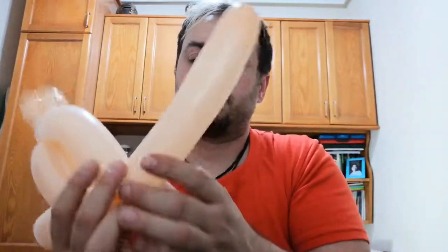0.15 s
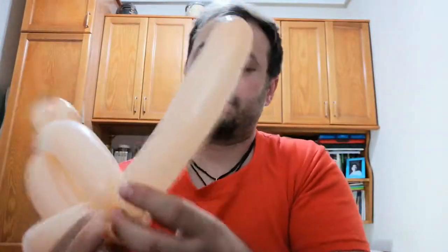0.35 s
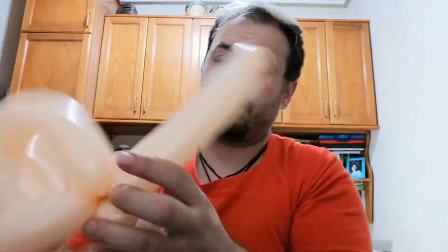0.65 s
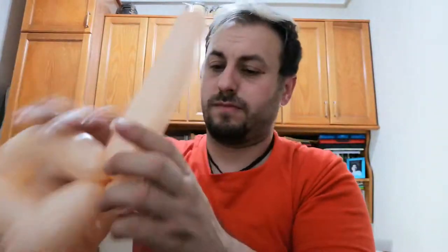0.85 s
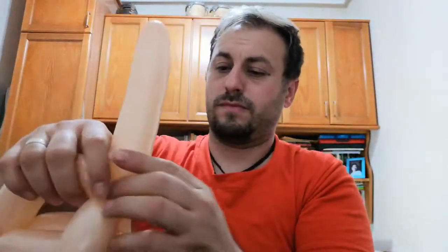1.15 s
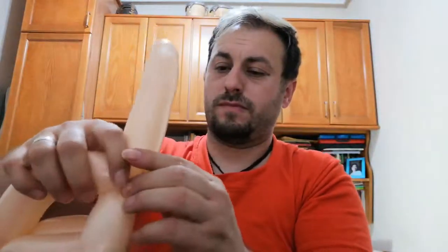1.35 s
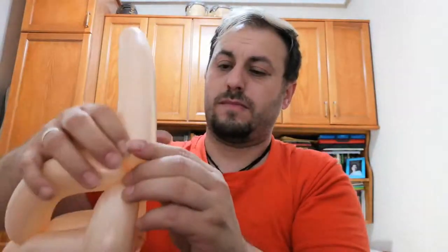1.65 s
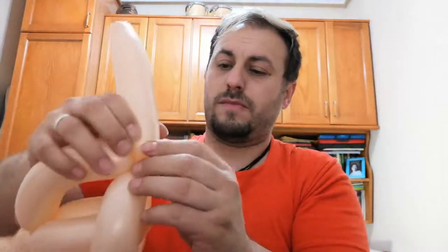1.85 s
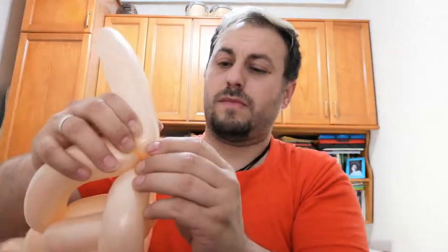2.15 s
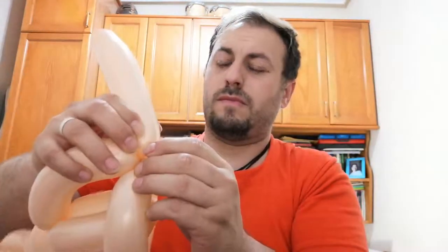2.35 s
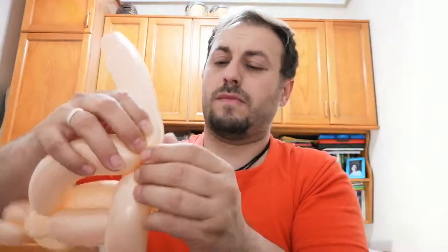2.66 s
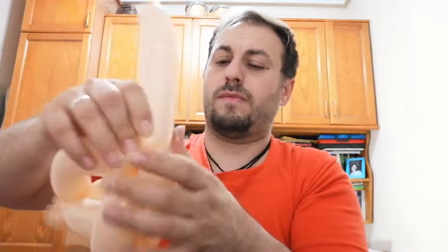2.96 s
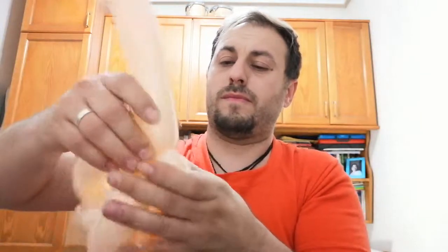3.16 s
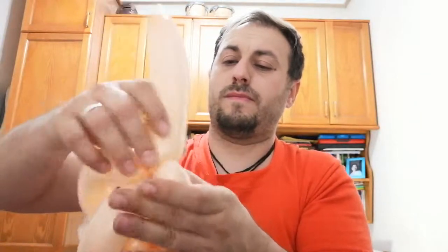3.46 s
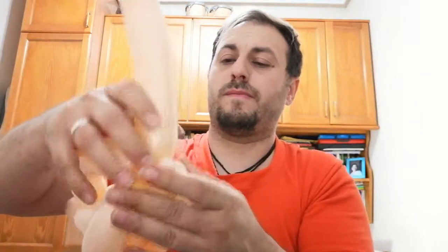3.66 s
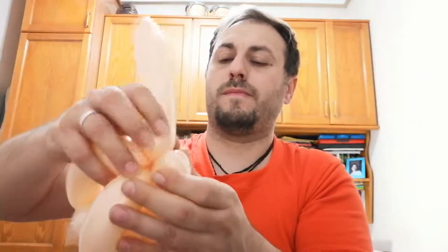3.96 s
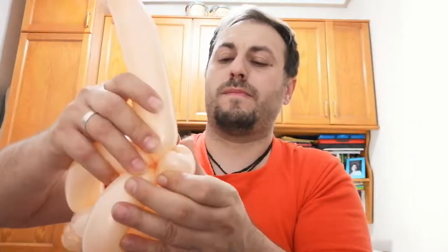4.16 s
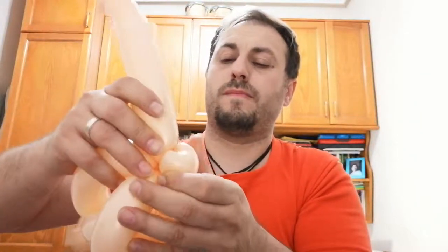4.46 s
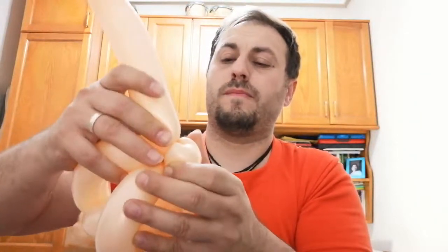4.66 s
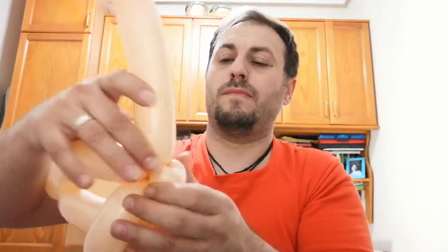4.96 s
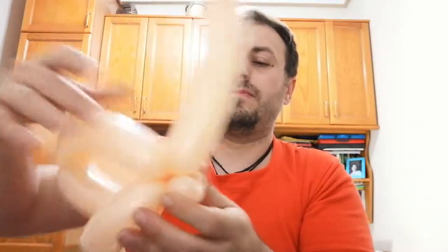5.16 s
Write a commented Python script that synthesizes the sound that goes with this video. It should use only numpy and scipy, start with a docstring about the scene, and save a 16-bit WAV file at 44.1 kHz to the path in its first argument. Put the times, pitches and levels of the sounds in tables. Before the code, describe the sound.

Taut latex balloons are twisted close to the microphone, with dry creaks, sharp snaps, short squeaks and low hollow thumps in a small room.

```python
"""A small, bare-walled room: long latex balloons are twisted by hand close to a stereo microphone.
Taut latex sticks and slips: single slips snap, runs of slips creak, regular fast ones squeak.
Every slip is a pulse that rings the balloon skin; low thumps, from handling or with snaps, ring the
air in the tubes. One hand slides along a tube as filtered noise; a noise tail is the room, over a
faint steady hush."""
import sys
import numpy as np
from scipy import signal
from scipy.fft import rfft, irfft, next_fast_len
from scipy.io import wavfile

SR = 44100
rng = np.random.default_rng(int(sys.argv[2]) if len(sys.argv) > 2 else 0)


def bounce(signal):
    """Save signal as a 16-bit WAV file at the path given by the first command-line argument."""
    frames = np.transpose(np.atleast_2d(signal))
    limited = np.clip(frames, -1, 1)
    pcm = np.round(limited * 32767).astype(np.int16)
    wavfile.write(sys.argv[1], SR, pcm)


N = 233818  # length in samples

# single hard slips: (time [s], level [dB], treble [dB])
SNAPS = [(0.0406, -11.5, -4), (0.0713, -19, 9), (0.0829, -18, 4.5), (0.158, -17, 6.5), (0.176, -16.5, 3),
         (0.2293, -24, 4), (0.3058, -13.5, 7), (0.4404, -20, 5), (0.4474, -12.5, 1), (0.5214, -24.5, 2),
         (0.612, -27, -6), (0.9742, -16.5, -3.5), (1.2139, -16, -2), (1.4503, -13.5, -5.5),
         (1.5637, -21, -2), (1.7506, -29.5, 14), (1.847, -25.5, 2), (2.0037, -22, 4), (2.1763, -17.5, -2),
         (2.2913, -12.5, -2.5), (2.4281, -20, -2), (2.4989, -23, 0), (2.5379, -11, 3), (2.5931, -11.5, 3.5),
         (2.7263, -28.5, -8), (2.7705, -18.5, 10.5), (2.868, -23, 30), (2.965, -25, 0), (3.0051, -17, -1.5),
         (3.0624, -19, -8), (3.2157, -21.5, 4), (3.3305, -14.5, 0), (3.3398, -17.5, -7), (3.357, -19, 14),
         (3.3756, -17.5, 2), (3.442, -23.5, 9), (3.5355, -20, 10.5), (3.609, -15.5, -1), (3.7, -16, -4),
         (3.7424, -21.5, 3), (3.7676, -21, -10), (3.83, -19.5, -7), (3.8905, -16.5, 1), (3.97, -20, 0),
         (4.0041, -17, 2), (4.067, -14.5, 0), (4.086, -23, 7), (4.109, -12.5, 0.5), (4.154, -14, 3),
         (4.183, -15, 0.5), (4.269, -13, 0.5), (4.2985, -16.5, 3), (4.3443, -11.5, 6.5), (4.3614, -18, 3),
         (4.409, -14.5, 3.5), (4.4332, -19.5, 7), (4.4944, -26.5, -3), (4.5812, -25, 0.5),
         (4.616, -20.5, -16), (4.7184, -12, 3), (4.7277, -15, 8), (4.792, -18.5, -3), (4.9706, -17, -3),
         (5.0664, -19.5, 0.5), (5.2208, -17.5, -1), (5.272, -18.5, 1.5)]
# rubbing strokes: (start [s], end [s], mean slip rate [1/s], level [dB])
RUBS = [(0, 0.105, 356, -28.5), (0.159, 0.212, 464, -30), (0.224, 0.354, 202, -37.5),
        (0.451, 0.48, 490, -31.5), (0.499, 0.571, 160, -45), (0.639, 0.677, 260, -37),
        (0.918, 1.176, 472, -33), (1.039, 1.063, 300, -29), (1.176, 1.254, 457, -24),
        (1.329, 1.354, 160, -37.5), (1.491, 1.528, 108, -33.5), (1.658, 1.682, 680, -24),
        (1.701, 1.811, 385, -34), (1.831, 1.909, 370, -32), (1.926, 1.949, 276, -26.5),
        (1.998, 2.072, 560, -28), (2.085, 2.152, 386, -31), (2.191, 2.21, 330, -39),
        (2.327, 2.39, 103, -33), (2.437, 2.47, 192, -30), (2.477, 2.533, 153, -27.5),
        (2.54, 2.623, 156, -36), (2.791, 2.824, 800, -25.5), (2.825, 2.93, 240, -30.5),
        (2.921, 2.988, 366, -26), (3.024, 3.043, 300, -24.5), (3.104, 3.178, 370, -25),
        (3.188, 3.288, 345, -23.5), (3.296, 3.456, 243, -29), (3.459, 3.635, 290, -25.5),
        (3.669, 3.712, 275, -24.5), (3.714, 3.79, 304, -29.5), (3.835, 3.845, 410, -23),
        (3.952, 4.072, 340, -26), (4.068, 4.101, 410, -21.5), (4.111, 4.188, 420, -30.5),
        (4.208, 4.541, 203, -36.5), (4.615, 4.704, 190, -28.5), (4.743, 4.912, 570, -25.5),
        (4.942, 4.967, 224, -32.5), (4.973, 4.994, 406, -21.5), (5.004, 5.086, 253, -34),
        (5.268, 5.299, 326, -30.5)]
RUB_TREBLE_DB = 0


def undb(db):
    """Decibels to gain."""
    return 10 ** (np.asarray(db) / 20)


def unit(x):
    """Scale to an energy of one per channel, averaged over the channels."""
    return x / np.sqrt(np.mean(np.sum(x ** 2, axis=-1)) + 1e-18)


def seconds(length):
    """Time axis of the given length in seconds."""
    return np.arange(int(length * SR)) / SR


def add(out, start, x):
    """Mix x into out from the given time on."""
    i = max(int(start * SR), 0)
    out[:, i:i + x.shape[-1]] += x[..., :max(N - i, 0)]


def convolve(a, b):
    """Convolution along time, channel by channel."""
    return signal.fftconvolve(np.atleast_2d(a), np.atleast_2d(b), axes=-1)


def butter(order, hz, kind="low"):
    """Butterworth filter sections."""
    return signal.butter(order, hz, kind, fs=SR, output="sos")


def spectrum_db(points, f):
    """Join (frequency [Hz], level [dB]) points on a log-frequency axis."""
    hz, db = np.transpose(points)
    return np.interp(np.log(f + 1), np.log(hz), db)


def colour(x, points):
    """Filter a long sound by (frequency [Hz], level [dB]) points."""
    size = next_fast_len(N)
    gain = undb(spectrum_db(points, np.fft.rfftfreq(size, 1 / SR)))
    return irfft(rfft(x, size) * gain, size)[..., :N]


def still_room():
    """The faint steady hush of the still room: shaped noise, independent at each ear."""
    # spectrum of the hush: (frequency [Hz], relative level [dB])
    hush_points = [(25, -13), (62, 16), (130, -15), (300, 10), (1500, 1), (6000, -30), (15000, -29)]
    hush = colour(rng.standard_normal((2, N)), hush_points)
    return undb(-50) * np.sqrt(N) * unit(hush)


def room(x, wet_db, t60_low=0.33, t60_high=0.39, build_s=0.0034):
    """Close walls: a dense tail, different at each ear; its treble starts lower and dies a little later."""
    t = seconds(.6)
    noise = rng.standard_normal((2, len(t)))
    low = signal.sosfilt(butter(2, 4000), noise)
    high = signal.sosfilt(butter(2, 4000, "high"), noise[::-1])  # ears swapped
    tail = low * undb(-60 * t / t60_low) + high * undb(-60 * t / t60_high - 1.0)
    build_up = 1 - np.exp(-(t / build_s) ** 2)
    return undb(wet_db) * convolve(x, unit(tail * build_up))[:, :N]


def grip(at):
    """Hollow body [dB] and ring of the contact patch [Hz] at a moment."""
    # the hold on the balloon; pinched hard for the twist it loses its hollow ring,
    # and the wound-up neck rings higher: (time [s], hollow body [dB], patch ring [Hz])
    hold = [(0, 0.5, 2010), (0.6, 9, 1900), (1.15, 3, 2100), (1.33, -1, 2030), (1.45, -9.5, 2160),
            (1.7, -16.5, 2180), (2.17, -13.5, 1900), (2.2, 10, 2130), (2.29, -20, 2200), (2.58, -9.5, 2030),
            (2.73, 1, 2200), (3.3, 2, 1880), (3.83, 1.5, 1900), (3.99, -4.5, 1970), (4.08, 1, 2000),
            (4.2, -2.5, 3080), (4.45, -2.5, 3560), (4.64, 2, 1900), (4.82, -6.5, 1770), (5.02, 1.5, 1900),
            (5.3, 4.5, 2320)]
    times, body_db, patch_hz = np.transpose(hold)
    return np.interp(at, times, body_db), np.interp(at, times, patch_hz)


def modes(table, spread=0.026):
    """Impulse response of (frequency [Hz], width [Hz], level [dB]) resonances, each randomly detuned."""
    t = seconds(.2)
    total = 0
    for k, (hz, width, db) in enumerate(table):
        tuned_hz = hz * (1 + spread * rng.standard_normal())
        ring = np.sin(2 * np.pi * tuned_hz * t) * np.exp(-np.pi * width * t)
        total = total + (-1) ** k * undb(db) * unit(ring)  # neighbours in opposite polarity
    return unit(total)


def slips(length, first_hz, last_hz, scatter, size_db):
    """Stick-slip pulses at scattered intervals; each is sized by the interval before its latest one."""
    count = max(int(length * SR), 64)
    chance = np.random.default_rng(rng.integers(2 ** 31)).standard_normal((2, 600))
    wait = np.exp(scatter * chance[0] - scatter ** 2 / 2)  # in cycles, mean one
    cycles = np.cumsum(np.linspace(first_hz, last_hz, count)) / SR
    at = np.searchsorted(cycles, np.cumsum(wait) - wait[0])
    sizes = np.sqrt(np.roll(wait, 1)) * undb(size_db * np.clip(chance[1], -2, 2))
    return np.bincount(at, sizes, count + 1)[:count]


def slide():
    """A hand gliding along one tube: friction noise, partly shared by the ears, bows its resonances."""
    # loudness of the slide, silent outside these times: (time [s], level [dB])
    slide_level = [(.75, -58), (.775, -37.5), (.835, -39.5), (.865, -32.5), (.92, -23), (.95, -25.5),
                   (.98, -65)]
    # what the hand sets ringing: (frequency [Hz], width [Hz], level [dB])
    slide_modes = [(163, 6.4, -0.5), (276, 9.8, -8), (944, 83, -6.5), (1600, 67, -5), (1830, 33, -4.5),
                   (2200, 180, -3.5), (5600, 12000, -8.5)]
    t = np.arange(N) / SR
    friction = rng.standard_normal(N) + 1.1 * rng.standard_normal((2, N))
    bowed = convolve(friction, modes(slide_modes, spread=0.0048))[:, :N]
    level = undb(np.interp(t, *np.transpose(slide_level)))
    sliding = (t > slide_level[0][0]) * (t < slide_level[-1][0])
    return bowed / bowed.std() * level * sliding


def kneading(push_db=1, push_s=0.0043, ring_db=-3, drag_db=-10, body_share=1.0):
    """Low thumps, from handling or with snaps, push and ring the tubes' air; a loose dragging grip stirs it."""
    # low thumps of the air in the tubes, some from handling, some together with snaps:
    # (time [s], pitch [Hz], level before the push and ring gains [dB])
    air_thumps = [(0.037, 280, -30), (0.172, 248, -30), (0.422, 95.5, -32.5), (0.463, 175, -24),
                  (0.926, 112, -17.5), (0.94, 58, -26), (1.007, 90.5, -30), (1.088, 96, -26.5),
                  (2.204, 90, -40.5), (3.035, 101, -26), (3.271, 196, -20.5), (3.327, 216, -19.5),
                  (3.353, 260, -23), (3.531, 175, -22.5), (3.613, 161, -23), (3.688, 350, -23),
                  (3.772, 172, -28.5), (4.067, 266, -32), (4.131, 267, -31.5), (4.244, 191, -30),
                  (4.371, 161, -26.5), (5.28, 107, -28.5)]
    # air columns in the tubes, before detuning: (frequency [Hz], width [Hz], level [dB])
    air_columns = [(51, 220, 0.5), (103, 13.5, -1), (161, 4.7, -2.5), (212, 5.7, -4), (275.4, 28, -0.5),
                   (351.4, 17, -7.5), (426, 59, -4)]
    # one more thump goes with each single snap; spread in log pitch
    recoil_db, recoil_hz, recoil_spread = -17, 227.5, 0.275
    out = np.zeros((2, N))
    t = seconds(.2)
    recoils = []
    for start, db, _ in SNAPS:
        hz = recoil_hz * np.exp(recoil_spread * rng.standard_normal())
        recoils.append((start, hz, db + recoil_db + min(grip(start)[0], 2)))
    for start, hz, db in air_thumps + recoils:
        push = np.sin(2 * np.pi * hz * t) * t / push_s * np.exp(1 - t / push_s)
        air = modes(air_columns)
        thump = undb(push_db) * push + undb(ring_db) * air / np.abs(air).max()
        add(out, start, undb(db) * thump)
    for start, end, rate, db in RUBS:
        body_db, _ = grip((start + end) / 2)
        drive = slips(end - start, rate, rate, scatter=.8, size_db=0.5)
        stirred = unit(convolve(drive, modes(air_columns)))
        level_db = db + drag_db + body_share * min(body_db, 6)
        add(out, start, undb(level_db) * np.sqrt(len(drive)) * stirred)
    return out


def skin(treble_db, body_db, treble_hz=3300, body_hz=780, size=1024):
    """Causal response of the latex: a tight grip is bright, a loose one lets the hollow body speak."""
    # what the skin radiates before the grip's changes: (frequency [Hz], level [dB])
    skin_points = [(60, -40), (200, -13), (400, -9), (700, -4.5), (1000, 3.5), (1350, 1.5), (1850, 2.5),
                   (2500, 5), (3100, -2.5), (3900, -3.5), (5800, -6), (8500, -14.5), (12000, -13.5),
                   (15000, -31)]
    f = np.fft.rfftfreq(size, 1 / SR)
    treble = treble_db * (1 - 1 / (1 + (f / treble_hz) ** 6))
    body = body_db / (1 + (f / body_hz) ** 8)
    # fold the cepstrum to get minimum phase
    cepstrum = irfft(np.log(undb(spectrum_db(skin_points, f) + treble + body)))
    cepstrum[1:size // 2] *= 2
    cepstrum[size // 2 + 1:] = 0
    return irfft(np.exp(rfft(cepstrum)))


def contact(patch_hz, patch_db, kick_db, scatter_s, patch_s=0.0017, tube_db=-10):
    """One slip at two ears: a kick, the patch's ring, waves running round the skin, the tube's rings."""
    # lasting rings of the inflated tubes, before detuning:
    # (frequency [Hz], 60 dB decay [s], level before tube_db [dB])
    tube_rings = [(562, 0.07, -33.5), (895, 0.014, -32), (1774, 0.022, -23.5), (2287, 0.089, -39.5)]
    t = seconds(.05)
    patch = unit(np.sin(2 * np.pi * patch_hz * t) * np.exp(-t / patch_s))
    # mostly separate at the two ears
    waves = rng.standard_normal((2, len(t))) + 0.057 * rng.standard_normal(len(t))
    scatter = unit(waves * np.exp(-t / scatter_s))
    tube = 0
    for hz, t60, db in tube_rings:
        tuned_hz = hz * (1 + 0.039 * rng.standard_normal())
        tube = tube + undb(db) * np.cos(2 * np.pi * tuned_hz * t) * undb(-60 * t / t60)
    return undb(kick_db) * (t == 0) + undb(patch_db) * patch + scatter + undb(tube_db) * tube


def wander(drive, patch_hz, patch_db, kick_db, scatter_s, spread=0.13, count=3):
    """The slips wander between a few places on the skin, each with its own ring."""
    place = rng.integers(0, count, len(drive))
    patches_hz = patch_hz * np.exp(spread * rng.standard_normal(count))
    return sum(convolve(drive * (place == k), contact(hz, patch_db, kick_db, scatter_s))
               for k, hz in enumerate(patches_hz))


def squeaks(onset_s=0.0028, rasp_db=5):
    """Slips lock into a gliding or steady pitch: clean low overtones under a rasp."""
    # regular slipping; the row at 1.619 s stands for the tube ringing on after a squeak:
    # (start [s], end [s], first pitch [Hz], last pitch [Hz], period scatter [share],
    #  level [dB], treble [dB], hollow body [dB])
    squeak_rows = [(1.404, 1.444, 931.5, 849, 0.14, -17.5, 6, -15.5),
                   (1.572, 1.597, 376.6, 399.5, 0.024, -25.5, 7, -8),
                   (1.602, 1.624, 522.7, 678, 0.019, -20.5, 7.5, 10),
                   (1.619, 1.65, 643, 632, 0.024, -27.5, 9, 7),
                   (1.786, 1.796, 1175, 1110, 0.06, -28.5, 0, 8),
                   (1.91, 1.934, 1059, 1105, 0.1, -26, 10, 4)]
    out = np.zeros((2, N))
    for start, end, first_hz, last_hz, scatter, db, treble_db, body_db in squeak_rows:
        drive = slips(end - start, first_hz, last_hz, scatter, size_db=-1.5)
        drive = drive * (1 - np.exp(-np.arange(len(drive)) / SR / onset_s))  # soft onset
        rasp = wander(drive, patch_hz=1900, patch_db=-6.5, kick_db=-6.5, scatter_s=0.0021, count=4)
        padded = np.pad(drive - drive.mean(), (0, rasp.shape[1] - len(drive)))
        tone = signal.sosfilt(butter(3, 2400), padded)
        sound = convolve(unit(tone) + undb(rasp_db) * unit(rasp), skin(treble_db, body_db))
        add(out, start, undb(db) * np.sqrt(len(drive)) * unit(sound))
    return out


def pressure(count, swell_db=2, judder_db=0.97, judder_s=0.016):
    """Force of the hand through one stroke: it swells and eases, and judders on the way."""
    t = np.arange(count) / SR
    judder = np.interp(t / judder_s, np.arange(64), rng.standard_normal(64))
    return undb(swell_db * np.sin(np.pi * t / t[-1]) + judder_db * judder)


def rubs():
    """Latex drags over latex and fingers in uneven slips, the pressure swelling within each stroke."""
    ring_share = 0.889  # a dragging patch is wider than a snapping one and rings lower
    out = np.zeros((2, N))
    for start, end, rate, db in RUBS:
        body_db, hz = grip((start + end) / 2)
        drive = slips(end - start, rate, rate, scatter=.45, size_db=3.2)
        pressed = drive * pressure(len(drive))
        creak = wander(pressed, ring_share * hz, patch_db=-12.0, kick_db=-11.5, scatter_s=0.0023)
        sound = convolve(creak, skin(RUB_TREBLE_DB, body_db))
        add(out, start, undb(db) * np.sqrt(len(drive)) * unit(sound))
    return out


def catches(per_s=8, over_rub_db=1.5, scatter_db=2.5):
    """Now and then a stroke catches and lets go with a small snap: (time [s], level [dB], treble [dB])."""
    rows = []
    for start, end, _, db in RUBS:
        waits = rng.gamma(2, .5, 8) / per_s
        sizes = rng.standard_normal(8)
        for at, size in zip(start + np.cumsum(waits), sizes):
            if at < end:
                rows.append((at, db + over_rub_db + scatter_db * size, RUB_TREBLE_DB))
    return rows


def snaps(rows, before_db=-16, before_s=0.0016, after_db=-12, after_s=0.008, lasts_s=0.0043):
    """The contact's edge gives way first, then the twist lets go at once, and a few tiny slips follow."""
    # harder snaps are thinner: dB of body lost per dB over the usual level
    snap_body_db, thinning, usual_db = -3, 0.42, -17
    out = np.zeros((2, N))
    t = seconds(.008)
    for start, db, treble_db in rows:
        hollow_db, hz = grip(start)
        body_db = hollow_db + snap_body_db - thinning * (db - usual_db)
        before, after = rng.standard_normal((2, len(t))) ** 3  # cubed: sparse, spiky slips
        creep = undb(before_db) * unit(before * np.exp(-t / before_s))[::-1]  # grows to the release
        release = (t == 0) + undb(after_db) * unit(after * np.exp(-t / after_s))
        slip = contact(hz, patch_db=-17.0, kick_db=-12, scatter_s=0.0019)
        ring = convolve(slip, skin(treble_db, body_db))
        sound = unit(convolve(np.concatenate([creep, release]), ring))
        add(out, start - t[-1], undb(db) * np.sqrt(lasts_s * SR) * sound)
    return out


def scene():
    """Latex and air, each with its share of the room, over a faint steady background."""
    quiet = still_room()
    air = kneading() + slide()
    latex = rubs() + squeaks() + snaps(SNAPS + catches())
    return latex + room(latex, wet_db=-5.5) + air + room(air, wet_db=-11.5) + quiet


def record(dry):
    """Each microphone port has its own colour; loud peaks are rounded, deepest bass and top are cut."""
    # left minus right: (frequency [Hz], level difference [dB])
    ear_points = [(150, 0), (320, -1), (600, -5.5), (800, 2.5), (1200, 1.5), (2300, 4.5), (3300, 4.5),
                  (5000, -3.5), (8700, -11), (11500, 2.5), (15000, 2)]
    top_hz = 15600
    ears = np.array([colour(x, [(hz, side * db / 2) for hz, db in ear_points])
                     for x, side in zip(dry, (1, -1))])
    rounded = 1.15 * np.tanh(ears / 1.15)
    no_rumble = signal.sosfilt(butter(2, 38, "high"), rounded)
    return signal.sosfilt(signal.ellip(8, .2, 70, top_hz, fs=SR, output="sos"), no_rumble)


dry = scene()
out = record(dry)
bounce(out)
```